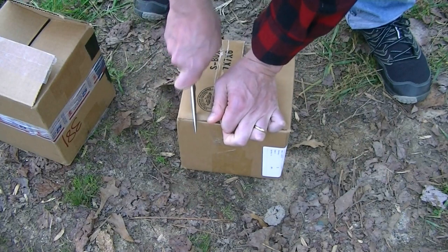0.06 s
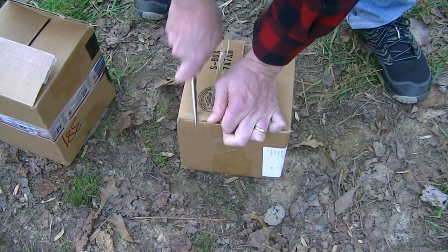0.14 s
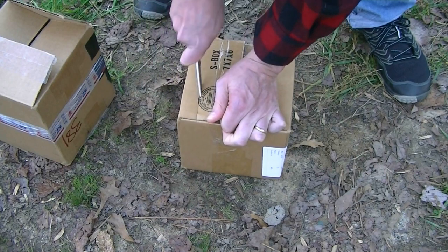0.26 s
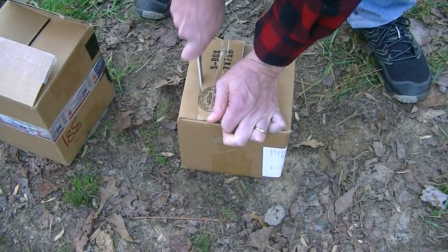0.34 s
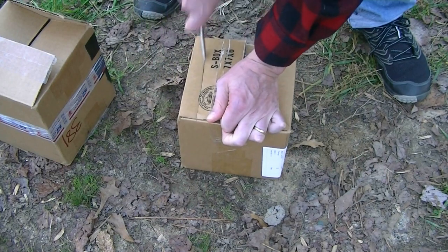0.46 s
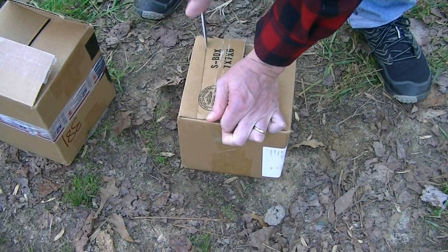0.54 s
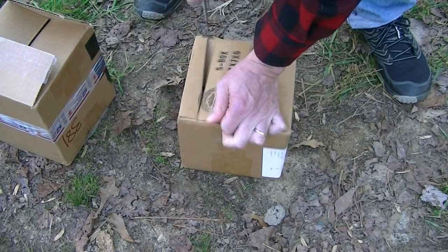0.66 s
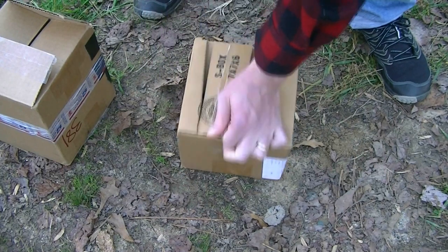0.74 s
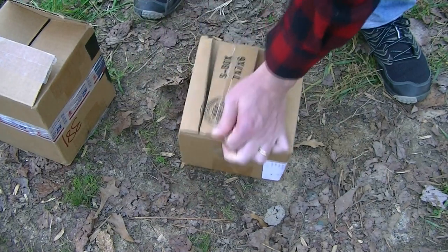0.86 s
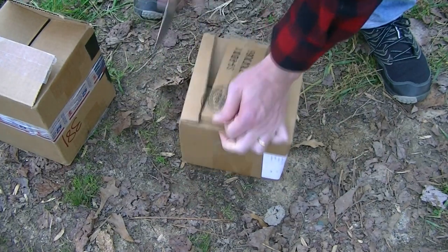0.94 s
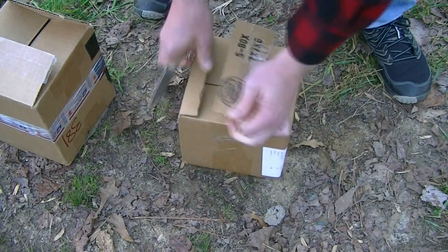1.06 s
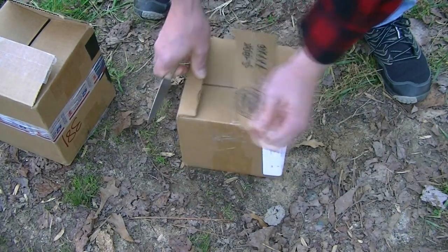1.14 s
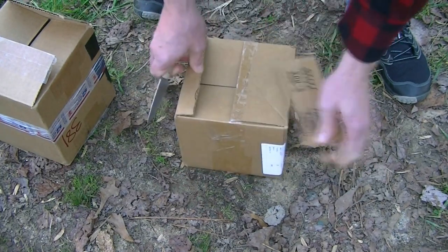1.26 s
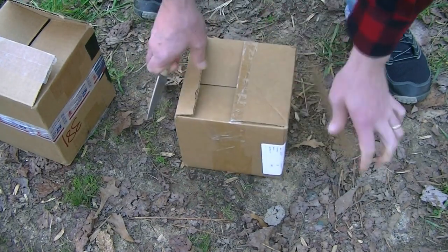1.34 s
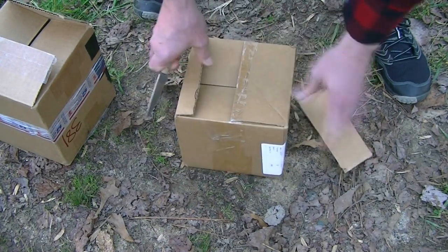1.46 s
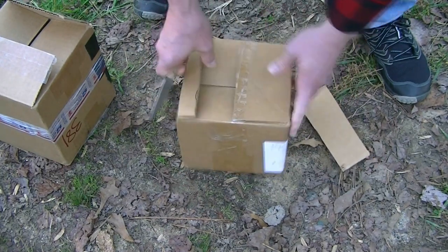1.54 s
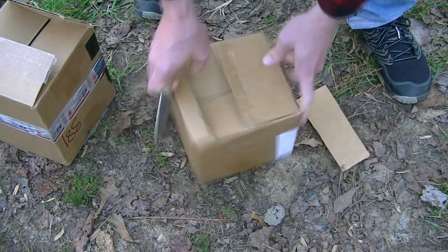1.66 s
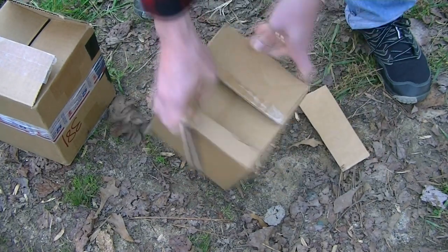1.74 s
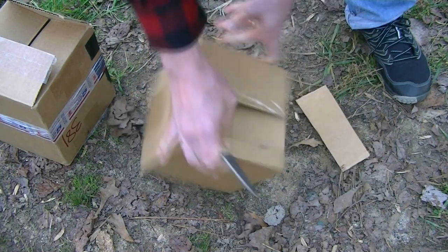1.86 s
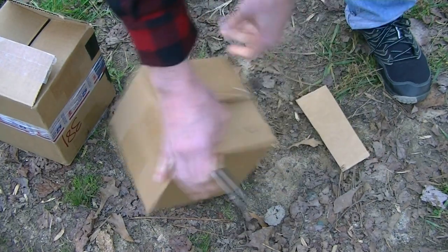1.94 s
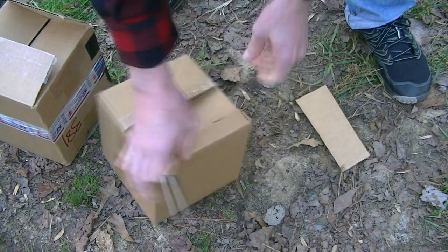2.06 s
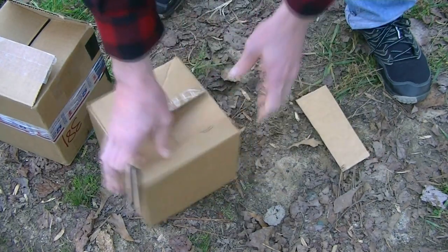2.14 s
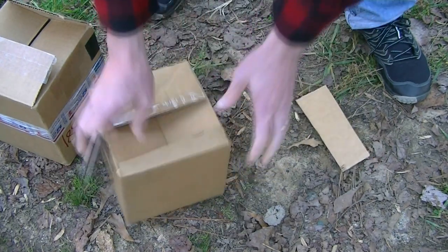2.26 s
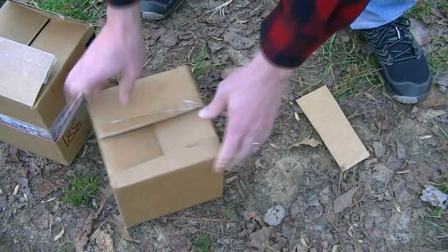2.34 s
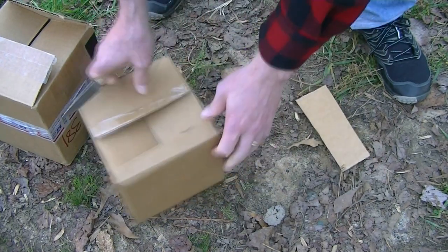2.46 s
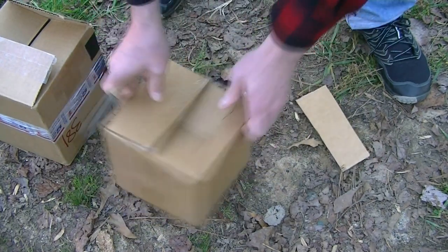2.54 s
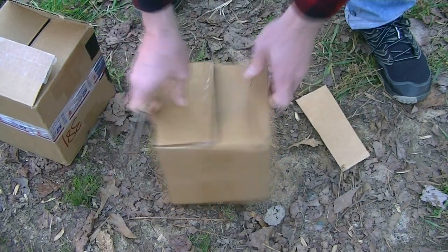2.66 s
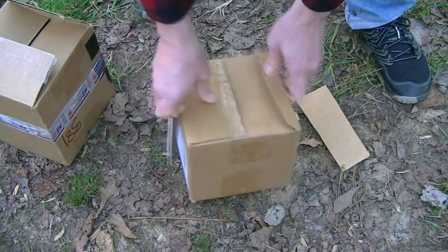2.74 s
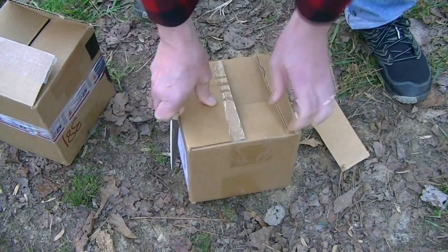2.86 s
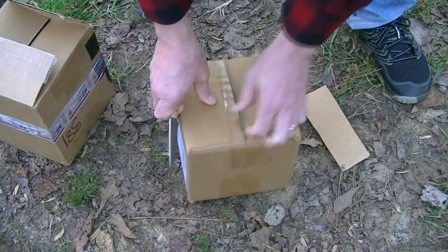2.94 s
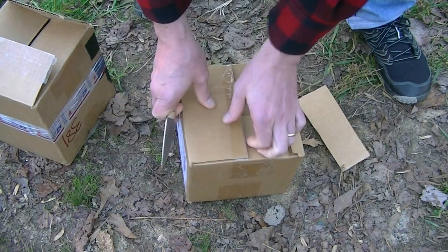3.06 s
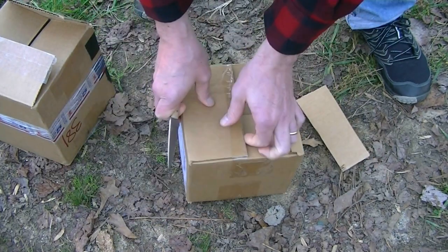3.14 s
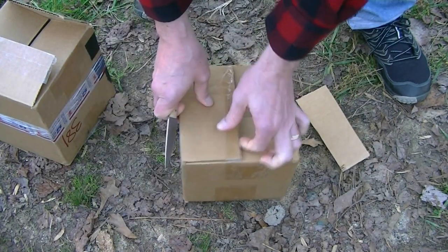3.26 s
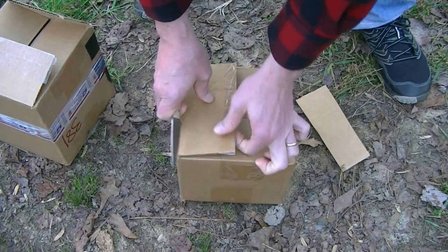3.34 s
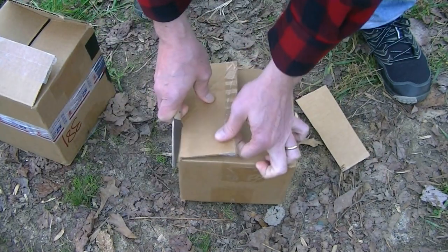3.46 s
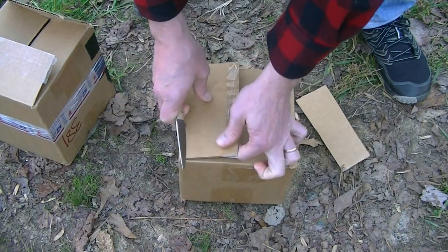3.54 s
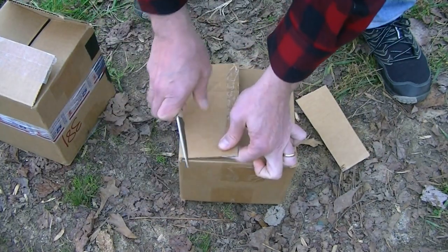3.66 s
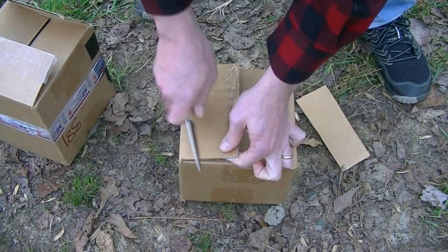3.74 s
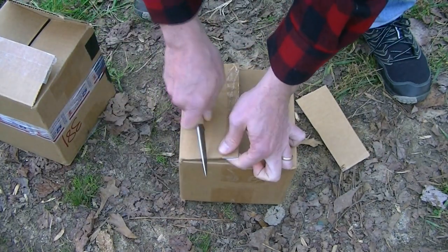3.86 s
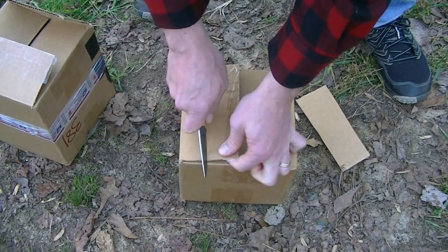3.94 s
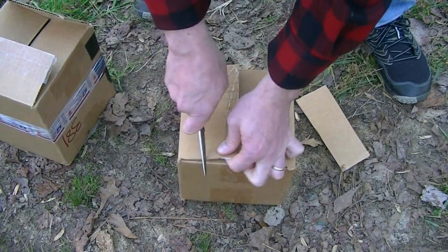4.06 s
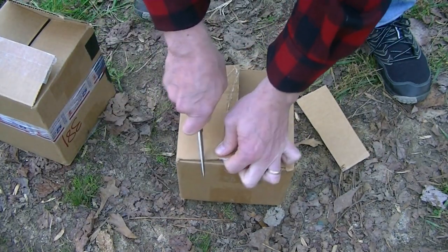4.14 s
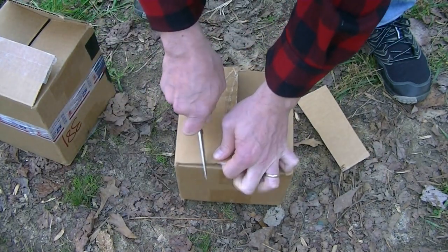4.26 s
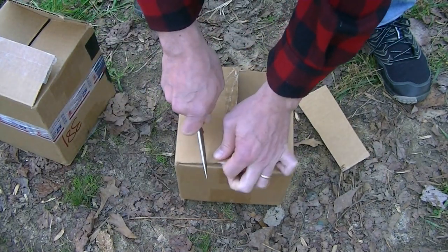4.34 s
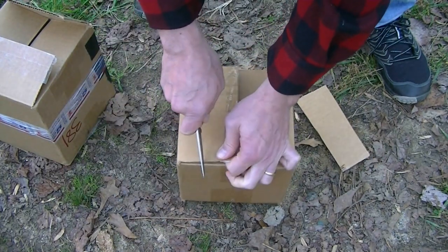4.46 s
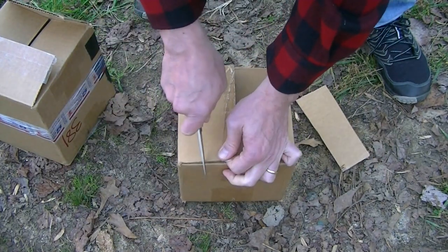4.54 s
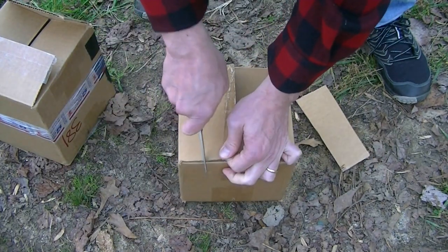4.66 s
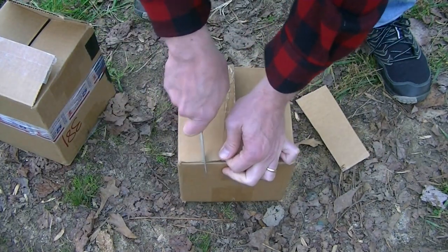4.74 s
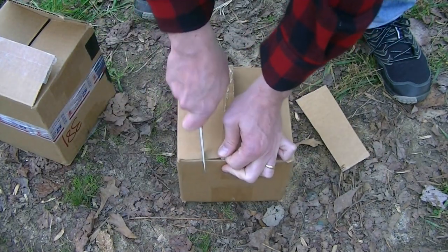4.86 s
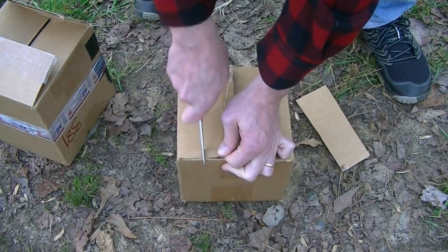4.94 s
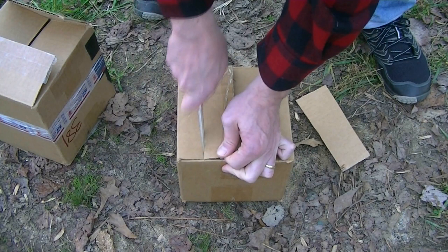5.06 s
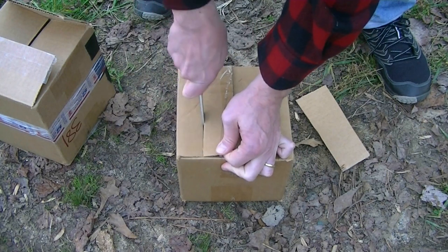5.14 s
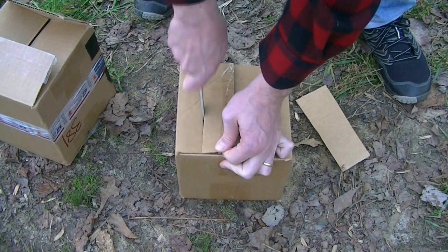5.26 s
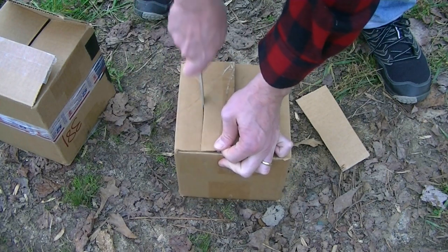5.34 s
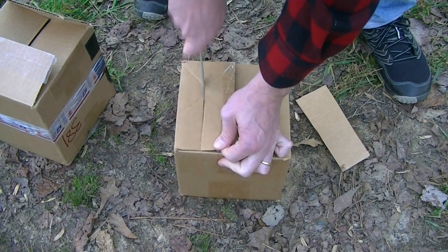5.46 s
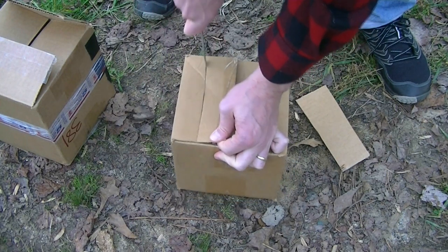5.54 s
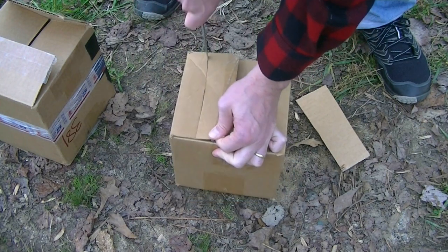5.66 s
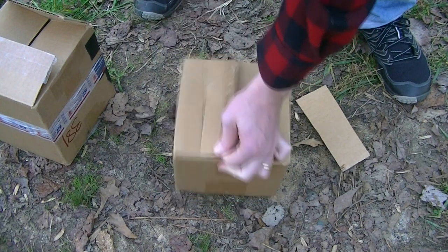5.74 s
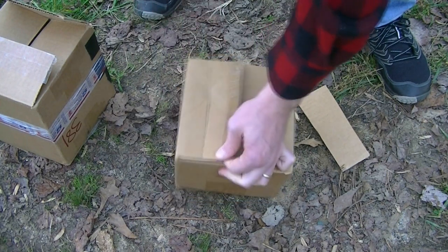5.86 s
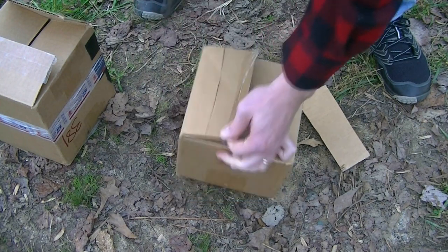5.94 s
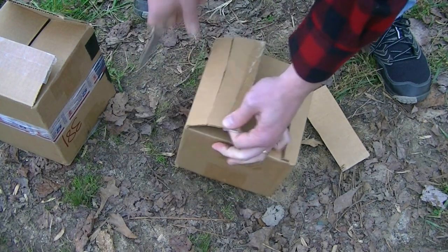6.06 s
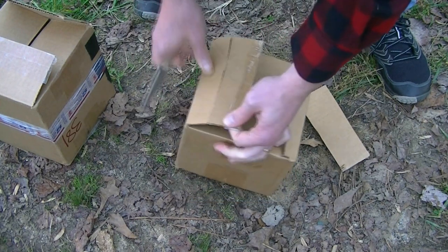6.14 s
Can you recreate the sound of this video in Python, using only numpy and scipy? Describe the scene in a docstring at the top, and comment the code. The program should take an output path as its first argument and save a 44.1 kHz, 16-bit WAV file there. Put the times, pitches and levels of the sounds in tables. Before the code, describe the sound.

A blade hisses and rasps through a cardboard box, tearing in quick gritty stutters to a sharp hollow knock. A dull pop follows, then quieter hands rubbing, soft creaks and knocks as the box is tipped and turned on soft ground. Scattered dry ticks lead to a stab, a gliding hiss, another scratchy rip and a hard thump. Close stereo microphones outdoors, very dry, with faint still air.

```python
"""A knife slits a cardboard box on bare ground outdoors; the box is tipped, turned over and slit again.
Random fibre snaps follow the force on the blade and shake the hollow box; smooth noise makes the blade's glide.
Short rips, a stab and one dull pop break the board; knocks ring its panels, and bumps ring its bed of soil.
Hands rub the faces with gritty noise, tape and dry leaves tick, folds creak, over still outdoor air."""
import sys
import numpy as np
from scipy import signal
from scipy.fft import rfft, irfft, next_fast_len
from scipy.io import wavfile
from scipy.ndimage import uniform_filter1d, map_coordinates

SR = 44100
rng = np.random.default_rng(int(sys.argv[2]) if len(sys.argv) > 2 else 0)


def generate_wav(sig):
    """Save sig (samples, or channels by samples) to the path in sys.argv[1] as 16-bit PCM at SR."""
    pcm = np.round(np.clip(np.atleast_2d(sig).T, -1, 1) * 32767).astype(np.int16)
    wavfile.write(sys.argv[1], SR, pcm)


N = 273508  # length of the scene in samples
SPAN = SR // 4  # a quarter second, room for one short event
AGE = np.arange(SPAN) / SR  # seconds since the event began

# Ways the hollow box rings. Each row: pitch in Hz, relative level in dB, time to fade by 60 dB in seconds.
BOX_MODES = [(122.6, -14, 0.1), (147.5, -8, 0.064), (198, -6.5, 0.097), (237.7, -4, 0.062),
             (290.2, -2, 0.11), (335.6, 0.5, 0.042), (449, 0.5, 0.072), (494.7, -1, 0.057)]
# Ways the stiff panels ring, with the same columns: pitch in Hz, relative level in dB, 60 dB fade in seconds.
PANEL_MODES = [(529, 0, 0.029), (697, -5, 0.057), (829.5, -2, 0.054), (879, 1, 0.022), (1100, 1, 0.012),
               (1400, -14.5, 0.042), (1700, -2, 0.026), (1820, -4, 0.029), (2400, -12, 0.027),
               (2820, -5, 0.0069)]
# Bright colour of snapping fibres. Each row: frequency in Hz, relative level in dB.
FIBRE_COLOUR = [(1800, -29), (3000, -9), (3600, -8), (5000, -5), (6500, -6), (8400, -8.5), (9400, -4.5),
                (11000, -2), (12200, -6.5), (13700, -21), (16000, -26)]
# Lower, rough colour of the rasping board. Each row: frequency in Hz, relative level in dB.
RASP_COLOUR = [(350, -38), (620, -7.5), (780, -7), (930, -1.5), (1120, -7.5), (1400, -5.5), (1650, -10),
               (2000, -8), (2450, -14.5), (2950, -13.5), (3300, -20), (3900, -64), (7000, -73)]
# Bright colour of light friction and dry snaps. Each row: frequency in Hz, relative level in dB.
HISS_COLOUR = [(1760, -7.5), (3000, -5.5), (3750, -5.5), (4860, -2.5), (6530, -2.5), (7780, 0),
               (8340, -3.5), (10400, -1), (12500, -7), (16000, -26)]
# Colour of panels stirred by light friction. Each row: frequency in Hz, relative level in dB.
RUSTLE_COLOUR = [(320, -33), (550, -8), (747, -6), (828, 0.5), (1000, -11.5), (1540, -7.5), (2030, -10.5),
                 (2800, -19.5), (3300, -16.5), (3600, -40), (4680, -20.5), (7920, -120)]


def amp(db):
    """Turn decibels into gain."""
    return 10 ** (np.asarray(db) / 20)


def unit(x):
    """Scale to an rms of 1."""
    return x / np.sqrt(np.mean(x ** 2) + 1e-20)


def burst(x):
    """Scale so that the loudest 4 ms have an rms of 1."""
    return x / np.sqrt(uniform_filter1d(x * x, size=176).max() + 1e-20)


def along(points, hz):
    """Read a curve of (Hz, value) points on a log frequency axis."""
    f, v = np.transpose(points)
    return np.interp(np.log(hz + 1), np.log(f + 1), v)


def filtered(x, response):
    """Multiply the spectrum of x by a response of frequency."""
    n = x.shape[-1]
    m = next_fast_len(n + SPAN)
    return irfft(rfft(x, m) * response(np.fft.rfftfreq(m, 1 / SR)), m)[..., :n]


def colour(x, spectrum):
    """Pass x through a spectrum of (Hz, dB) points."""
    return filtered(x, lambda hz: amp(along(spectrum, hz)))


def ring(x, modes, detune=0.053, spread_db=2.0):
    """A force shakes the modes; grip and contact point shift their pitch and strength at random."""
    chance = rng.standard_normal((len(modes), 2))
    answer = np.zeros(SPAN)
    for k, ((hz, db, t60), (a, b)) in enumerate(zip(modes, chance)):
        fade = amp(db + spread_db * b - 60 * AGE / t60)
        # neighbouring modes start in opposite directions
        answer += (-1) ** k * fade * np.sin(2 * np.pi * hz * (1 + detune * a) * AGE)
    return signal.fftconvolve(x, answer)[:len(x)]


def wobble(rate, n):
    """A smooth random curve with rate knots a second."""
    knots = rng.standard_normal(int(n * rate / SR) + 4)
    return map_coordinates(knots, [np.arange(n) * rate / SR])


def snaps(n, rate, grit):
    """Tiny ruptures, about rate a second, carry the share grit of the power; smooth friction carries the rest."""
    grains = (rng.random(n) < rate / SR) * rng.laplace(size=n)
    share = np.clip(grit, 0, 1)
    return np.sqrt(share) * unit(grains) + np.sqrt(1 - share) * rng.standard_normal(n)


def patchy(x, depth_db):
    """The colour shifts at random as the contact point travels over the board."""
    z = signal.stft(x, nperseg=512)[2]
    field = uniform_filter1d(rng.standard_normal(z.shape), size=5, axis=0)
    field = uniform_filter1d(field, size=10, axis=1)
    return signal.istft(z * amp(depth_db * unit(field)), nperseg=512)[1][:len(x)]


def stroke(rows):
    """Give the start time and one gain curve for each level column, with soft ends."""
    s, *cols = np.transpose(rows)
    t = np.arange(s[0], s[-1], 1 / SR)
    ends = np.clip(np.minimum(t - t[0], t[-1] - t) / 0.0039, 0, 1)
    return s[0], [ends * amp(np.interp(t, s, c)) for c in cols]


def add(track, s, sound):
    """Mix a sound in at time s."""
    place = track[max(round(s * SR), 0):][:len(sound)]
    place += sound[:len(place)]


def cutting(catch_hz=150, catch_db=2.0, edge_hz=2950, sharpness=8, bundle_db=-11, stall_s=0.0046):
    """The edge catches and slips on the flutes; one force of snapping fibres drives panels and box."""
    # Force on the blade, one list for each long cut. Each row: time in seconds, effort in dB.
    efforts = [
        [(0.18, -35), (0.232, -28), (0.338, -34.5), (0.388, -28.5), (0.462, -37.5), (0.492, -31.5), (0.58, -35),
         (0.588, -43), (0.664, -32.5)],
        [(5.185, -47), (5.219, -39.5), (5.245, -45.5), (5.255, -34), (5.413, -36.5), (5.465, -27.5),
         (5.639, -41), (5.661, -49), (5.7, -31)],
    ]
    # Tone of each cut. Each row: fibre, panel rasp and box drone in dB above the effort,
    # gain of the singing cut edge.
    cut_tones = [(-4, -4, -3.5, 0.099), (-3.5, -2.5, -7.5, 0.94)]
    # The blade sticks for an instant. Each row: time in seconds, drop in effort in dB (negative is a surge).
    stalls = [(0.211, 9), (0.278, 17), (0.305, 11), (0.331, 10), (0.594, 7), (5.243, -6)]
    out = np.zeros(N)
    for rows, (fibre_db, rasp_db, drone_db, sing) in zip(efforts, cut_tones):
        s, (effort,) = stroke(rows)
        n = len(effort)
        t = s + np.arange(n) / SR
        drop_db = sum(drop * np.exp(-((t - at) / stall_s) ** 2) for at, drop in stalls)
        effort = effort * amp(-drop_db)
        force = patchy(snaps(n, rate=2500, grit=0.29), depth_db=2.5) * amp(catch_db * wobble(catch_hz, n))
        # now and then a whole bundle of fibres parts at once
        bundles = (rng.random(n) < 150 / SR) * (2 * rng.random(n) - 1)
        force = unit(force) + amp(bundle_db) * unit(bundles)
        force = force + sing * signal.lfilter(*signal.iirpeak(edge_hz, sharpness, SR), force)
        drone = amp(drone_db) * unit(ring(force, BOX_MODES))
        fibres = amp(fibre_db) * unit(colour(force, FIBRE_COLOUR))
        rasp = amp(rasp_db) * unit(colour(force, RASP_COLOUR))
        add(out, s, effort * (fibres + rasp + drone))
    return out


def gliding(steel_db=-1.0, slit_db=-2.0):
    """The flat of the blade glides into the slit: an even hiss of steel on paper with hollow resonances."""
    # One list for each glide. Each row: time in seconds, treble level in dB, body level in dB,
    # both before the trims steel_db and slit_db.
    glides = [
        [(0.0, -41.5, -44), (0.19, -43.5, -46)],
        [(4.85, -57, -53.5), (4.908, -41.5, -38.5), (5.008, -36.5, -42), (5.055, -44, -41)],
    ]
    # Colour of the steel's hiss. Each row: frequency in Hz, relative level in dB.
    steel_colour = [(3000, -13.5), (4100, -6), (4800, -2.5), (5300, -6), (6200, 1), (7000, -5), (7700, -4),
                    (8500, -2), (11000, -1), (12500, -12), (16000, -26)]
    # Colour of the hollow of the slit. Each row: frequency in Hz, relative level in dB.
    slit_colour = [(120, -32), (300, -3), (580, -13), (720, -1), (880, 7), (1130, -4), (1400, -2.5),
                   (1850, 7.5), (2150, -5), (2400, 4.5), (2900, -22), (3350, 1), (3850, -58), (7000, -55)]
    out = np.zeros(N)
    for rows in glides:
        s, (treble, body) = stroke(rows)
        force = patchy(rng.standard_normal(len(body)), depth_db=3.5)
        steel = treble * amp(steel_db) * unit(colour(force, steel_colour))
        slit = body * amp(slit_db) * unit(colour(force, slit_colour))
        add(out, s, steel + slit)
    return out


def rips():
    """Open rips and scuffs are bright; the tip stabbing through the taped lid is duller."""
    # Short rips and scuffs. Each row: start in seconds, panel level in dB, box and fibre in dB above it
    # (levels before the trims in rupture), length in seconds.
    rip_rows = [(0.212, -21.5, -13, 0, 0.019), (0.239, -25, 1.5, 0, 0.033), (0.288, -21, -7, -15, 0.018),
                (0.312, -25.5, -8, -0.5, 0.013), (0.369, -21.5, -8, -3, 0.025), (0.409, -35, 6, 13, 0.021),
                (0.661, -16, -2, -5, 0.015), (0.683, -32.5, 13, -5, 0.031), (1.59, -43.5, 5, 13, 0.021),
                (1.731, -29.5, -3, 0.5, 0.013), (1.995, -36.5, 3, 0, 0.035), (2.459, -39.5, 11, -12, 0.016),
                (2.704, -26.5, -2, -6, 0.022), (2.931, -32.5, 1, 0.5, 0.036),
                (2.965, -30.5, 0.5, -2.5, 0.038), (3.292, -33.5, -4.5, -8, 0.042),
                (3.463, -42, 3.5, 6, 0.033), (4.231, -33, -2, -5.5, 0.053), (5.049, -21, 2, 0, 0.031),
                (5.064, -14, -13, -2.5, 0.026), (5.091, -18.5, -3.5, -2, 0.035),
                (5.254, -36.5, -5, 7.5, 0.039), (5.454, -26, 0, -5, 0.018), (5.513, -24, -13, 2, 0.013),
                (6.057, -32, -1.5, 3.5, 0.015)]
    # The stab, with the same columns: start in seconds, panel level in dB, box and fibre in dB above it,
    # length in seconds.
    stab_rows = [(4.713, -19.5, -7, -3, 0.043), (4.727, -15.5, -9.5, -3.5, 0.034)]
    # The buried tip muffles the top. Each row: frequency in Hz, level in dB.
    stab_dull = [(7500, -0.5), (9000, -1), (12000, -12)]
    out = np.zeros(N)
    for s, *rip in rip_rows:
        add(out, s, rupture(*rip))
    for s, *rip in stab_rows:
        add(out, s, colour(rupture(*rip), stab_dull))
    return out


def rupture(db, box, fibre, length, panel_db=-7, box_db=-7, fibre_db=-8, catch_db=3, catch_hz=260,
            rasp=1.6, rise=0.0036):
    """The board gives way in a quick stutter of ruptures that shakes panels and box."""
    swell = (1 - np.exp(-AGE / rise)) / (1 + (AGE / max(length, .003)) ** 6)
    force = patchy(snaps(SPAN, rate=3400, grit=0.45), depth_db=2.5) * swell
    force = force * amp(catch_db * wobble(catch_hz, SPAN))
    panel = burst(burst(ring(force, PANEL_MODES)) + rasp * burst(colour(force, RASP_COLOUR)))
    hollow = amp(box + box_db) * burst(ring(force, BOX_MODES))
    fibres = amp(fibre + fibre_db) * burst(colour(force, FIBRE_COLOUR))
    return amp(db) * (amp(panel_db) * panel + hollow + fibres)


def pop(flap_hz=700, t60=0.0018, dull_hz=2300, box_db=-7, snap_db=-20, snap_t60=0.029):
    """The last fibres snap and the cut flap flips through once, hardly ringing, and shakes the box."""
    # The one pop: time in seconds, level of the flip in dB.
    flap_pop = (1.3035, -21.5)
    out = np.zeros(N)
    s, db = flap_pop
    flip = np.cos(2 * np.pi * flap_hz * AGE) * AGE * amp(-60 * AGE / t60)
    flip = signal.sosfilt(signal.butter(2, dull_hz, fs=SR, output="sos"), flip)
    snap = snaps(SPAN, rate=4900, grit=0.41) * amp(-60 * AGE / snap_t60)
    snap = amp(snap_db) * burst(colour(snap, HISS_COLOUR))
    shaken = amp(box_db) * burst(ring(flip, BOX_MODES + PANEL_MODES))
    add(out, s, amp(db) * (burst(flip) + shaken + snap))
    return out


def knocks(panel_db=-5, box_db=-5, crack_db=-7, push=1.8, face=2.5, sharpness=2.8, crush=0.001,
           dent_db=-10, dent_t60=0.0026):
    """A push and a dying crunch dent the struck face and ring the box, most strongly near that face's pitch."""
    # Blows on the box. Each row: start in seconds, panel level in dB, thump and crack in dB above it
    # (levels before the trims), pitch of the struck face in Hz, 60 dB fade of the contact in seconds.
    knock_rows = [(0.028, -21, -16, -11, 1300, 0.037), (0.669, -13, -4.5, -4, 1100, 0.028),
                  (0.703, -16.5, -6, -4, 453, 0.049), (1.04, -40, 0.5, -3, 487, 0.092),
                  (1.134, -49.5, 5.5, -17, 452, 0.024), (1.539, -31, 9.5, -9.5, 452, 0.023),
                  (1.553, -24.5, -1, -13, 456, 0.031), (2.201, -37, 2.5, -12, 820, 0.047),
                  (2.357, -38.5, 3.5, -1, 880, 0.037), (2.507, -25, 6, 4, 450, 0.023),
                  (2.953, -21, -23, -17, 730, 0.016), (3.214, -38.5, -2, -2, 503, 0.016),
                  (3.849, -49.5, 5.5, 1, 856, 0.012), (4.3727, -38.5, -0.5, -16, 830, 0.024),
                  (4.755, -16.5, -5.5, -10, 910, 0.032), (4.774, -22.5, -1, -26, 450, 0.047),
                  (5.253, -26.5, -8, -14, 680, 0.032), (5.698, -21, 5, 2, 880, 0.037),
                  (5.71, -9.5, -5, -15, 850, 0.024), (5.721, -23.5, 5, -10, 458, 0.065)]
    out = np.zeros(N)
    for s, db, thump, crack, face_hz, decay in knock_rows:
        # the flutes crush first, so the contact takes a moment to build
        contact = (1 - np.exp(-(AGE / crush) ** 2)) * amp(-60 * AGE / max(decay, .002))
        crunch = snaps(SPAN, rate=1700, grit=0.48) * contact
        force = unit(crunch) / np.sqrt(SPAN) + push * (AGE == 0)
        panel = ring(force, PANEL_MODES)
        panel = panel + face * signal.lfilter(*signal.iirpeak(face_hz, sharpness, SR), panel)
        dent = np.sin(2 * np.pi * face_hz * AGE) * AGE * amp(-60 * AGE / dent_t60)
        rasp = 0.47 * burst(colour(crunch, RASP_COLOUR))
        panel = burst(burst(panel) + rasp + amp(dent_db) * burst(dent))
        hollow = amp(thump + box_db) * burst(ring(force, BOX_MODES))
        fibres = amp(crack + crack_db) * burst(colour(crunch, FIBRE_COLOUR))
        add(out, s, amp(db) * (amp(panel_db) * panel + hollow + fibres))
    return out


def bumps():
    """A heavy push rocks the whole box on soft ground, which answers with a low thud."""
    # Bumps on the soil. Each row: start in seconds, level in dB.
    bump_rows = [(2.356, -45.5), (2.469, -43), (2.506, -39.5), (5.062, -37.5), (5.104, -33), (5.469, -35),
                 (5.712, -32)]
    # The box on its bed of soil. Each row: pitch in Hz, relative level in dB, 60 dB fade in seconds.
    soil_modes = [(99, -7, 0.094), (138.5, 3, 0.13)]
    out = np.zeros(N)
    push = AGE * amp(-60 * AGE / 0.007)
    for s, db in bump_rows:
        add(out, s, amp(db) * burst(ring(push, soil_modes)))
    return out


def rubbing(drop_db=9, shape=1.49):
    """Each slide swells and dies with the speed of the hand, over the faint rustle of the grip."""
    # A hand or the soil slides over the board. Each row: time of the peak in seconds, rise and fall
    # in seconds (time to change by drop_db), then hiss, panel and box levels in dB.
    rub_rows = [(0.02, 0.034, .08, -60, -47, -65), (0.723, 0.011, 0.03, -54.5, -57, -52),
                (0.834, 0.022, 0.038, -55.5, -60, -52), (0.919, .06, 0.1, -60.5, -60, -60),
                (1.07, 0.03, 0.098, -49, -67, -54.5), (1.151, .015, 0.022, -67, -61, -71),
                (1.25, 0.061, .014, -51.5, -89, -76), (1.452, 0.012, 0.01, -45, -51, -47.5),
                (1.6, 0.047, 0.07, -42.5, -49, -59), (1.79, 0.061, .1, -46.5, -54, -55),
                (2.035, 0.046, 0.058, -45, -44, -41), (2.125, 0.034, 0.085, -57, -56.5, -56),
                (2.265, 0.078, 0.066, -55, -54, -55.5), (2.385, 0.037, 0.032, -51.5, -51.5, -66),
                (2.487, 0.054, 0.072, -41, -43, -50), (2.674, 0.051, 0.05, -49.5, -68, -70),
                (2.73, 0.047, 0.066, -48.5, -46.5, -50), (2.79, 0.022, 0.011, -42.5, -71, -48),
                (3.015, 0.023, 0.036, -52.5, -48, -59), (3.075, 0.029, .045, -62, -58, -52.5),
                (3.18, 0.056, 0.094, -58.5, -53, -51.5), (3.309, 0.044, 0.03, -50.5, -42, -44.5),
                (3.405, 0.1, 0.046, -66, -57.5, -54), (3.48, 0.02, 0.046, -53.5, -47.5, -52),
                (3.611, 0.031, 0.051, -57, -54.5, -54), (3.695, 0.02, 0.027, -49, -66, -56),
                (4.01, 0.047, 0.041, -58.5, -58, -64.5), (4.085, 0.028, 0.063, -55, -52, -51.5),
                (4.27, 0.068, 0.071, -55.5, -59, -47), (4.408, 0.0094, 0.022, -46, -45, -55),
                (4.46, .035, 0.035, -49, -47, -47.5), (4.545, 0.035, 0.038, -55.5, -50.5, -53),
                (4.625, 0.051, 0.024, -67, -56, -45.5), (4.79, 0.0088, 0.041, -54, -52, -49),
                (4.87, .03, 0.022, -72, -48, -50.5), (5.126, .01, 0.043, -70, -58, -58),
                (5.191, 0.015, 0.016, -50, -53, -62), (5.77, 0.092, 0.029, -45.5, -44.5, -48),
                (5.896, 0.055, 0.028, -51, -50, -52.5), (6.0, 0.095, 0.028, -51, -54, -54),
                (6.065, 0.037, 0.038, -49, -44.5, -44)]
    # The hands hold the box and never rest entirely. Each row: start in seconds, end in seconds.
    holds = [(0.74, 1.31), (1.5, 2.5), (2.95, 4.7), (5.799, 6.19)]
    # Levels of the grip: hiss, panel and box in dB.
    hold_levels = (-71.5, -67, -67.5)
    out = np.zeros(N)
    t = np.arange(-SPAN, SPAN) / SR
    for s, rise, fall, *levels in rub_rows:
        away = np.abs(t / np.where(t < 0, rise, fall))
        add(out, s + t[0], amp(-drop_db * away ** shape) * sliding(len(t), *levels))
    for start, end in holds:
        n = round((end - start) * SR)
        add(out, start, signal.windows.tukey(n, .05) * sliding(n, *hold_levels))
    return out


def sliding(n, hiss_db, panel_db, box_db, drag_hz=55, drag_db=2.5):
    """Sliding contact: a soft hiss with sparse grit, which also stirs the panels and the box."""
    force = patchy(snaps(n, rate=470, grit=0.21), depth_db=2.5) * amp(drag_db * wobble(drag_hz, n))
    hiss = amp(hiss_db) * unit(colour(force, HISS_COLOUR))
    panel = amp(panel_db) * unit(colour(force, RUSTLE_COLOUR))
    return hiss + panel + amp(box_db) * unit(ring(force, BOX_MODES))


def ticks(snap_db=-8, panel_db=-8, t60=0.025):
    """Tape, fibres and dry leaves give single dry snaps: gritty noise that dies at once."""
    # Each row: start in seconds, treble level in dB, panel in dB above it (levels before the trims).
    tick_rows = [(0.2855, -23, -20), (0.4266, -29, -20), (0.4958, -21, -24), (0.604, -36, 10),
                 (0.756, -45, -6), (0.9242, -42.5, -10), (1.426, -35.5, -17), (1.5, -36, -28),
                 (2.164, -37.5, -10), (2.926, -42, 2), (2.982, -25, 0.5), (3.270, -34.5, 1.5),
                 (3.278, -29.5, -18), (3.3032, -27, 3), (3.3348, -25.5, -6), (3.4255, -41.5, -16),
                 (3.681, -37.5, -22), (3.6984, -37, -30), (3.7214, -32, -18), (4.0534, -32, -11),
                 (4.056, -37.5, -1.5), (4.7128, -26, 2.5), (4.845, -35.5, -21), (5.2214, -24, -9),
                 (5.306, -29, -10), (5.522, -28, 8.5), (5.588, -25.5, -22), (5.669, -31, -6),
                 (5.79, -32.5, 4), (5.936, -29, -12), (6.0316, -31, -13), (6.188, -31, -11)]
    out = np.zeros(N)
    for s, db, panel in tick_rows:
        force = snaps(SPAN, rate=4000, grit=0.9) * amp(-60 * AGE / t60)
        snap = amp(snap_db) * burst(colour(force, HISS_COLOUR))
        rustle = amp(panel + panel_db) * burst(colour(force, RUSTLE_COLOUR))
        add(out, s, amp(db) * (snap + rustle))
    return out


def creaks(sharpness=3, hiss_db=-11, soft_hz=9000, slip_s=0.011):
    """Folds and tape slip with a short creak; each slip of a run rings the same stiff fold."""
    # Each row: start in seconds, level in dB, pitch in Hz, 60 dB fade of a slip in seconds,
    # length of the run of slips in seconds.
    creak_rows = [(0.768, -48, 2020, 0.02, .005), (0.819, -50.5, 1490, 0.028, .005),
                  (1.440, -36, 2430, 0.029, .03), (1.667, -39.5, 2520, 0.045, .005),
                  (2.077, -36.5, 830, 0.018, .005), (2.104, -39, 1300, 0.033, .005),
                  (2.244, -51, 2400, 0.019, .005), (2.272, -46, 2400, 0.016, .005),
                  (2.309, -43.5, 2220, 0.03, .005), (3.795, -53, 1400, 0.018, .005),
                  (4.3733, -47, 1100, 0.015, .005), (4.567, -47.5, 1600, 0.011, .065)]
    out = np.zeros(N)
    for s, db, hz, decay, length in creak_rows:
        slip = amp(-60 * AGE / max(decay, .002))
        for at in np.arange(s, s + length, slip_s):
            force = snaps(SPAN, rate=3600, grit=1.0) * slip
            fold = signal.lfilter(*signal.iirpeak(hz, sharpness, SR), force)
            hiss = amp(hiss_db) * burst(colour(force, HISS_COLOUR))
            add(out, at, amp(db) * (burst(fold) + hiss))
    # soften the treble
    return filtered(out, lambda hz: 1 / np.sqrt(1 + (hz / soft_hz) ** 4))


def spread(x, side_db=1):
    """The bass reaches both microphones alike, the treble less so."""
    # Width of the sound. Each row: frequency in Hz, side minus mid level in dB before the trim side_db.
    width = [(60, -20.5), (1000, -14.5), (2000, -17), (2900, -7.5), (3600, -5), (6500, -7.5), (8400, -5),
             (10500, -5.5), (12000, -2.5), (14000, -0.5)]
    # Balance of the sound. Each row: frequency in Hz, left minus right level in dB.
    lean = [(100, -.5), (2600, 1), (3400, -3), (4200, 2.5), (6200, -0.5), (7500, -1), (9200, 4.5),
            (10800, 1.5), (12600, -4), (16000, -5)]
    z = signal.stft(x, nperseg=128)[2]
    # random phases make a side signal unlike the middle
    scrambled = z * np.exp(2j * np.pi * rng.random(z.shape))
    side = signal.istft(scrambled, nperseg=128)[1][:N]
    side = amp(side_db) * colour(side, width)
    pair = np.array([x + side, x - side])
    return filtered(pair, lambda hz: amp(np.outer([.5, -.5], along(lean, hz))))


def outdoors(x, scatter_db=-24, t60=0.35):
    """Ground, legs and the next box scatter a faint short tail to each ear."""
    tails = rng.standard_normal((2, SPAN)) * amp(-60 * AGE / t60) * (AGE > .003)
    tails = tails / np.linalg.norm(tails[0])
    return amp(scatter_db) * signal.fftconvolve(x[None], tails, axes=1)[:, :N]


def still_air(level_db=-58):
    """Still outdoor air: steady soft noise, drawn separately for the two microphones."""
    # Colour of the air. Each row: frequency in Hz, relative level in dB per Hz.
    air_colour = [(25, 1), (80, -3), (200, 2), (400, 0), (900, -2.5), (2000, -10.5), (5000, -15.5),
                  (11000, -24), (16000, -38)]
    return amp(level_db) * unit(colour(rng.standard_normal((2, N)), air_colour))


def scene():
    """The work on the box, spread to left and right, with its scattered tail and the still air."""
    work = cutting() + gliding() + rips() + pop() + knocks() + bumps() + rubbing() + ticks() + creaks()
    return spread(work) + outdoors(work) + still_air()


def record(dry, low_hz=75, top_hz=16000):
    """The microphone side thins the deep bass and keeps nothing above its band limit."""
    thinned = signal.sosfilt(signal.butter(3, low_hz, "high", fs=SR, output="sos"), dry)
    return filtered(thinned, lambda hz: hz < top_hz)


dry = scene()
out = record(dry)
generate_wav(out)
```